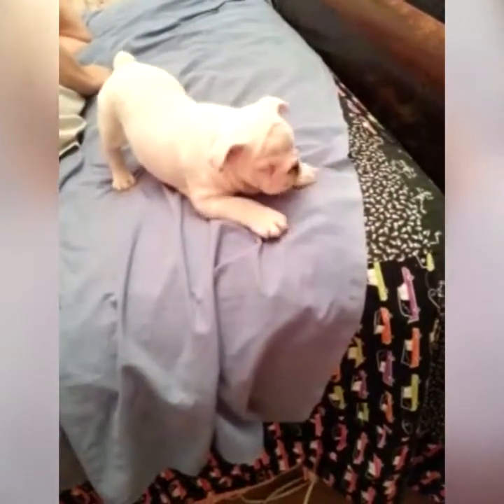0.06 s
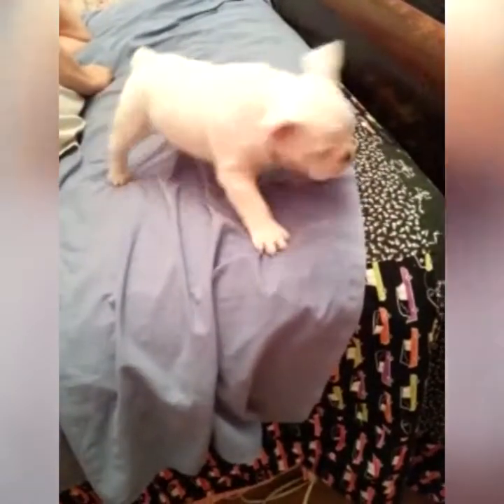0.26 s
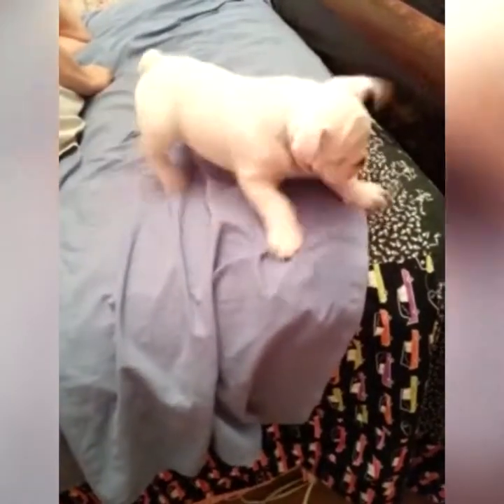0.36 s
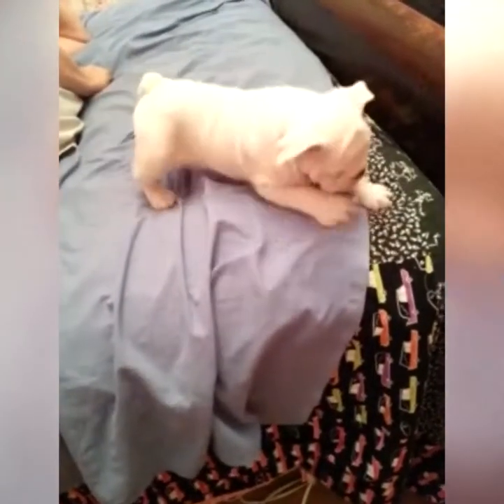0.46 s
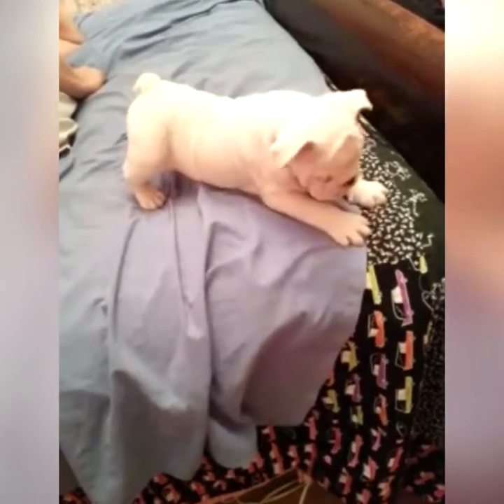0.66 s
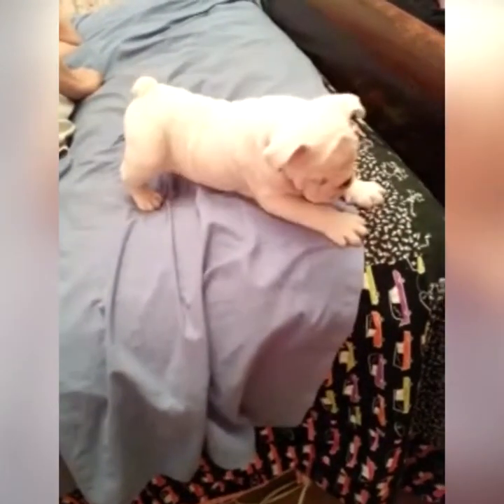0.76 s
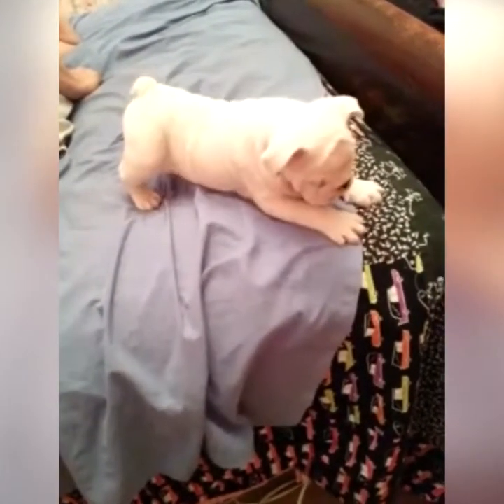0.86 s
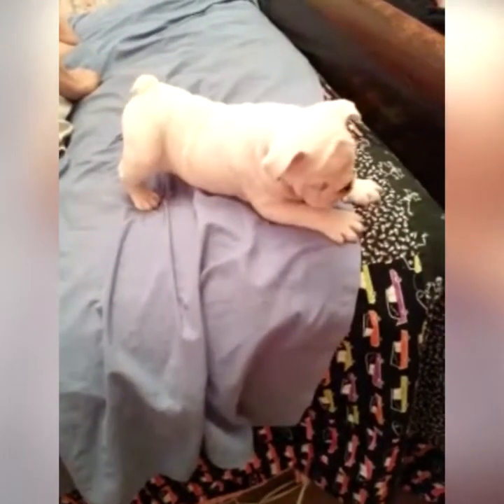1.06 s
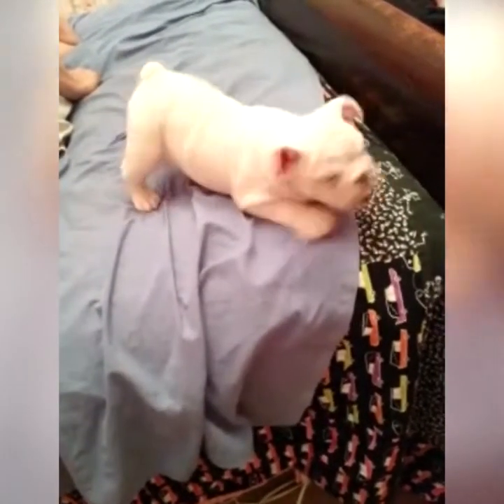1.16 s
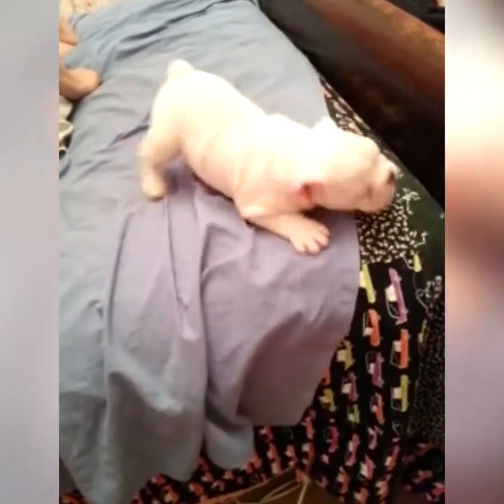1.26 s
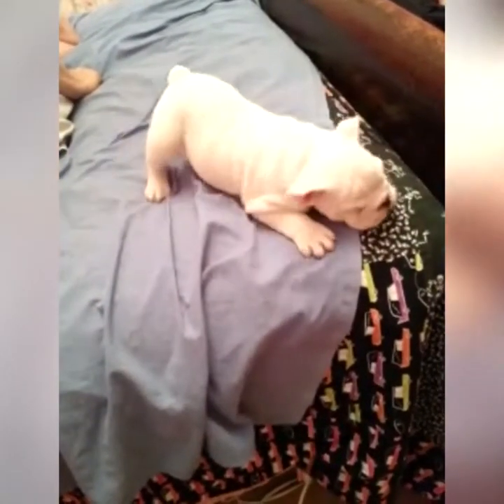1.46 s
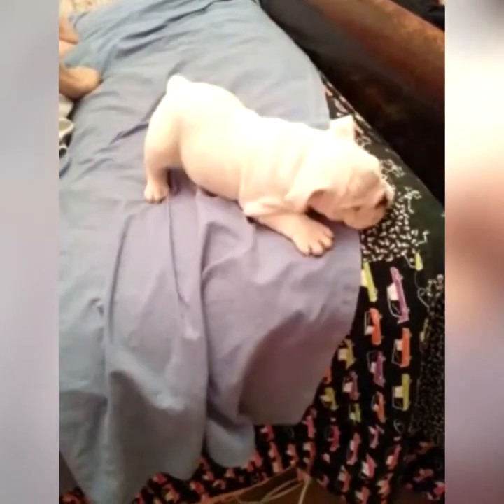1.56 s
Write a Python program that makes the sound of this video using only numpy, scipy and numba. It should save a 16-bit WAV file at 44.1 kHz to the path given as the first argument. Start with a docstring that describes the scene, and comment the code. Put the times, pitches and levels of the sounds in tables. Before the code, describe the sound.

A small puppy growls briefly, then gives two short, harsh barks close by.

```python
"""A small puppy on a bed, close by, in a soft small room with faint hum and hiss.
First a slow creaky growl: single vocal-fold flaps ring the throat and closed mouth. At 0.2 s it runs
into a bark that starts harsh, then locks into a clear tone while the mouth closes. Paws rustle the
bedding around it. At 1.2 s a few flaps lead into a second such bark, then more rustle and one tick.
Gain control ducks the loud moments, a bass thump sits under them and the highest peaks clip."""
import sys
import numpy as np
from scipy import signal
from scipy.fft import rfft, irfft, next_fast_len
from scipy.io import wavfile
from scipy.ndimage import uniform_filter1d, map_coordinates
from numba import njit

SR = 44100
rng = np.random.default_rng(int(sys.argv[2]) if len(sys.argv) > 2 else 0)


def wav_record(signal):
    """Record a signal, one row per channel, as 16-bit PCM in the file named by sys.argv[1]."""
    frames = np.transpose(np.atleast_2d(signal))
    bounded = np.clip(frames, -1, 1)
    # unit amplitude maps onto the largest positive 16-bit level
    quanta = np.round(bounded * 32767).astype(np.int16)
    wavfile.write(sys.argv[1], SR, quanta)


N = 72765

# Hum and hiss spectrum: freq_hz, relative_db
FLOOR_SPECTRUM = [(15, -55), (25, -19.5), (50, -15.5), (110, -6.5), (300, -14), (600, -21), (1200, -25.5),
                  (5000, -31.5), (9000, -32), (13000, -33), (15000, -38.5)]
# Left-right likeness of hum and hiss: freq_hz, correlation
FLOOR_CORRELATION = [(60, 0.18), (200, .3), (500, 0.035)]
# Room decay: freq_hz, t60_s
ROOM_DECAY = [(200, .3), (900, 0.2), (3000, 0.22), (12000, 0.056)]
# Bedding envelope, one list per rustle: time_s, relative_db
RUSTLES = [
    [(0.0, -68), (0.178, -64.5), (0.21, -50.5)],
    [(0.38, -54), (0.424, -58.5), (0.562, -60), (0.616, -66), (0.656, -65), (0.75, -75.5)],
    [(1.41, -51.5), (1.476, -59), (1.552, -66.5), (1.65, -74.5)],
]
# Cloth spectrum: freq_hz, relative_db
CLOTH_SPECTRUM = [(60, -31), (120, -10), (350, -3.5), (800, -11.5), (2000, -15), (3600, -16.5),
                  (6000, -23.5), (10000, -26), (15000, -28.5)]
# Claw or lip tick: start_s, level_db
TICK_EVENT = [(1.501, -28.5)]
# Single vocal-fold flaps: start_s, mouth_relative_db, throat_relative_db
FOLD_FLAPS = [(0.008, -34, -34.5), (0.023, -42, -43.5), (0.038, -35, -34), (0.051, -38.5, -31.5),
              (0.059, -40.5, -39), (0.081, -26, -45), (0.087, -35.5, -31.5), (0.096, -28, -44),
              (0.107, -27.5, -38.5), (0.12, -33.5, -30.5), (0.13, -30, -41), (0.143, -27, -34),
              (0.155, -18, -38.5), (0.163, -20, -32), (0.17, -28.5, -26.5), (0.186, -17.5, -20.5),
              (0.192, -15, -40), (0.204, -14, -21), (0.21, -16, -23), (1.219, -37.5, -53),
              (1.234, -20, -33), (1.243, -18, -39), (1.248, -18, -56), (1.253, -17.5, -37),
              (1.259, -22, -26)]
# Closed-mouth resonances: centre_hz, width_hz, gain_db
CLOSED_MOUTH_MODES = [(578.6, 120, 8.5), (1461, 480, 0)]
# Fold vibration through both barks: time_s, pitch_hz, disorder (0-1)
BARK_PITCH = [(.215, 325, .8), (.248, 345, .65), (.259, 330, .6), (.264, 425, .5), (.278, 432, .45),
              (.29, 467, .2), (.314, 466, .2), (.328, 435, .35), (.34, 415, .5), (.355, 320, .9),
              (.37, 420, 1), (1.26, 335, .8), (1.291, 333, .5), (1.297, 415, .2), (1.32, 418, .25),
              (1.34, 414, .4), (1.353, 372, .65), (1.385, 385, .9)]
# Harsh voice, one list per bark, levels relative:
# time_s, mouth_db, mouth_hz, upper_db, upper_hz, top_db, breath_db, chest_db
HARSH_BARKS = [
    [(0.215, -14.5, 994, -42, 2716, -44, -35, -32), (0.223, -8, 999, -27.5, 2780, -20, -35, -29),
     (0.233, -9, 993, -28.5, 2730, -13, -29, -17.5), (0.261, -10, 968, -18.5, 2690, -17, -27.5, -41),
     (0.305, -12, 908.5, -23, 2614, -25.5, -47.5, -59), (0.315, -19, 969, -23.5, 2546, -23, -46, -54),
     (0.349, -24.5, 886.4, -30, 2550, -30.5, -50, -33.5), (0.4, -37.5, 857, -39, 2690, -52.5, -56, -41.5)],
    [(1.263, -19, 1045, -20, 2860, -19.5, -38, -18.5), (1.27, -5.5, 1085, -31, 2723, -25, -41, -27.5),
     (1.276, -14.5, 1058, -24, 2790, -15, -39.5, -29), (1.292, -4, 971, -26, 2638, -18.5, -40.5, -36.5),
     (1.302, -15.5, 906.5, -18.5, 2536, -26, -37, -51), (1.312, -8.5, 860, -20.5, 2530, -21.5, -42, -36),
     (1.335, -16.5, 819, -19.5, 2133, -24.5, -49, -51), (1.358, -15, 776.3, -20, 2107, -27, -47.5, -33.5),
     (1.382, -22.5, 736, -29, 2220, -38, -45, -33), (1.42, -41.5, 794.6, -48.5, 2197, -59.5, -47.5, -68)],
]
# Breath spectrum: freq_hz, relative_db
BREATH_SPECTRUM = [(3800, -33.5), (4300, -14), (4750, -17.5), (5500, 3.5), (6400, -19.5), (7800, -10),
                   (10500, -7), (13000, -19), (15000, -32)]
# Clear voice, one list per bark: time_s, partial1_db, partial2_db, partial3_db
CLEAR_BARKS = [
    [(.222, -34, -46, -21), (.246, -36, -36.5, -10), (.26, -23.5, -18.5, -12), (.272, -16, -16.5, -31.5),
     (.296, -19.5, -6, -29), (.318, -21.5, -16.5, -31), (.335, -19, -17, -35), (.355, -29, -27, -42)],
    [(1.268, -34, -35, -17), (1.288, -23.5, -30, -16), (1.298, -20.5, -20.5, -25.5),
     (1.312, -11, -12.5, -28.5), (1.326, -30, -16.5, -22.5), (1.34, -18, -16, -27.5),
     (1.355, -35, -16.5, -45.5), (1.38, -39.5, -32.5, -30)],
]
# Phase between the two microphone ports: freq_hz, left_lead_rad
PORT_PHASE = [(0, 0), (520, 0), (860, -1.4), (1210, -1.1), (1810, -3.5), (2070, -6), (3270, -6.3),
              (3880, -7.9), (4910, -10.3), (15000, -20)]
# Balance between the ports: freq_hz, left_over_right_db
PORT_BALANCE = [(300, .3), (800, 3), (2500, .5), (5000, 3), (12000, 2.5)]

FLOOR_DB, ROOM_DB = -56, -6
RUSTLE_GAIN_DB, CLOTH_MONO_BELOW_HZ = 12.5, 350
TICK_HZ, TICK_T60_S = 1007, 0.021
FLAP_MOUTH_GAIN_DB, FLAP_TAU_S, LIPS_CUTOFF_HZ = 30, 0.0000775, 1750
LEAK_DB, LEAK_T60_S = -23, 0.035
THROAT_HZ, THROAT_WIDTH_HZ, THROAT_GAIN_DB = 270, 200, 36.5
NOSE_HZ, NOSE_WIDTH_HZ, NOSE_GAIN_DB = 3400, 660, -54.5
PULSE_JITTER, AIR_SHARE, CLEAR_WAVER = 0.27, 0.62, 0.04  # fractions at full disorder
JITTER_RATE_HZ, SCATTER_DB, SHIMMER_DB = 300, 2, 3
MOUTH_WIDTH_HZ, MOUTH_GAIN_DB = 320, 1.5
CHEST_HZ, CHEST_WIDTH_HZ, CHEST_GAIN_DB = 340, 220, -0.5
PALATE_HZ, PALATE_WIDTH_HZ, PALATE_GAIN_DB = 1550, 460, -13.5
UPPER_WIDTH_HZ, TOP_HZ, TOP_WIDTH_HZ = 650, 3300, 900
NOTCH_HZ, NOTCH_WIDTH_HZ, NOTCH_DEPTH = 1700, 160, 0.7
DUCK_THRESHOLD_DB, DUCK_SHARE, DUCK_TAU_S = -17.5, 0.77, 0.18
THUMP_HZ, THUMP_GAIN_DB = 45, -28.5
CLIP_LEVEL, CLIP_HARDNESS, BAND_LIMIT_HZ = 1.02, 18, 14800


def amp(db):
    """dB to gain."""
    return 10 ** (np.asarray(db) / 20)


def unit_rms(x):
    """Scale to rms 1."""
    return x / np.sqrt(np.mean(x ** 2) + 1e-20)


def log_interp(points, hz):
    """Interpolate (freq_hz, value) points on a log axis."""
    freqs_hz, values = np.transpose(points)
    return np.interp(np.log(hz + 1), np.log(freqs_hz + 1), values)


def curves(tables):
    """A gate with 4 ms edges, then each value column of the joined tables per sample."""
    t = np.arange(N) / SR
    gate = sum((t >= rows[0][0]) & (t <= rows[-1][0]) for rows in tables)
    times_s, *columns = np.transpose(np.vstack(tables))
    return [uniform_filter1d(gate * 1., size=176)] + [np.interp(t, times_s, c) for c in columns]


def wobble(rate_hz):
    """Smooth random curve, rate_hz knots a second."""
    knots = rng.standard_normal(int(N * rate_hz / SR) + 4)
    return map_coordinates(knots, [np.arange(N) * rate_hz / SR])


def filtered(x, response):
    """Apply a complex frequency response."""
    size = next_fast_len(N + SR // 2)
    return irfft(rfft(x, size) * response(np.fft.rfftfreq(size, 1 / SR)), size)[..., :N]


def noise(spectrum, channels):
    """Coloured noise, rms 1."""
    white = rng.standard_normal((channels, N))
    return unit_rms(filtered(white, lambda f: amp(log_interp(spectrum, f))))


def bandpass(f, hz, width_hz):
    """Response of one causal resonance at frequencies f."""
    return 1j * f * width_hz / (hz * hz - f * f + 1j * f * width_hz)


@njit
def resonate(x, step_rad, radius):
    """Two-pole resonator with a moving centre."""
    y = np.zeros(len(x))
    for i in range(2, len(x)):
        y[i] = x[i] - x[i - 2] + 2 * radius * np.cos(step_rad[i]) * y[i - 1] - radius ** 2 * y[i - 2]
    return y


def formant(x, hz, width_hz):
    """Two resonators in series, each width_hz wide; output rms 1."""
    step_rad = 2 * np.pi * hz * np.ones(N) / SR
    radius = np.exp(-np.pi * width_hz / SR)
    return unit_rms(resonate(resonate(x, step_rad, radius), step_rad, radius))


def hum_and_hiss():
    """Steady room noise, its low hum partly shared by both ports."""
    def mid_side_gains(f):
        angle_rad = np.arccos(log_interp(FLOOR_CORRELATION, f)) / 2
        return np.array([np.cos(angle_rad), np.sin(angle_rad)])

    mid, side = filtered(noise(FLOOR_SPECTRUM, channels=2), mid_side_gains)
    return amp(FLOOR_DB) * np.array([mid + side, mid - side])


def room_reverb(x):
    """Each frequency dies at its own rate; the lows reach both ports alike."""
    hz, t, bins = signal.stft(rng.standard_normal((2, SR // 2)), SR, nperseg=256)
    unshared = np.clip(hz / 900, 0, 1)[:, None] ** 2
    bins[1] = unshared * bins[1] + np.sqrt(1 - unshared ** 2) * bins[0]
    decay = amp(-60 * t / log_interp(ROOM_DECAY, hz)[:, None])
    tail = signal.istft(bins * decay, SR, nperseg=256)[1]
    delayed = np.pad(x, (200, 0))[None]
    return signal.fftconvolve(delayed, tail / np.linalg.norm(tail[0]), axes=1)[:, :N]


def bedding():
    """Cloth rustles unevenly under the paws."""
    gate, level_db = curves(RUSTLES)
    mid, side = noise(CLOTH_SPECTRUM, channels=2)
    side = filtered(side, lambda f: 1 / (1 + (CLOTH_MONO_BELOW_HZ / (f + 1)) ** 2))
    envelope = gate * amp(level_db + RUSTLE_GAIN_DB + 1.5 * wobble(rate_hz=49))
    return envelope * np.array([mid + side, mid - side]) / np.sqrt(2)


def tick():
    """A claw or lip clicks once: a damped sine."""
    start_s, level_db = TICK_EVENT[0]
    t = (np.arange(N) / SR - start_s).clip(0)
    attack = 1 - np.exp(-t / 0.00074)
    return amp(level_db - 60 * t / TICK_T60_S) * attack * np.sin(2 * np.pi * TICK_HZ * t)


def growl():
    """Soft fold flaps, each with a leak of air, ring closed mouth and throat; the nose adds breath."""
    def ring(f, hz, width_hz):
        return bandpass(f, hz, width_hz) * bandpass(f, hz, 3 * width_hz)

    def closed_mouth(f):
        soft_flap = 1 / (1 + 2j * np.pi * f * FLAP_TAU_S) ** 2
        shut_lips = 1 / (1 + 1j * np.sqrt(2) * f / LIPS_CUTOFF_HZ - (f / LIPS_CUTOFF_HZ) ** 2) ** 2
        modes = sum((-1) ** k * amp(gain_db) * ring(f, hz, width_hz)
                    for k, (hz, width_hz, gain_db) in enumerate(CLOSED_MOUTH_MODES))
        return soft_flap * shut_lips * modes

    flaps = np.zeros((2, N))  # rows: mouth, throat
    for start_s, mouth_db, throat_db in FOLD_FLAPS:
        flaps[:, round(start_s * SR)] = amp([mouth_db + FLAP_MOUTH_GAIN_DB, throat_db + THROAT_GAIN_DB])
    t = np.arange(SR // 10) / SR
    leak_shape = amp(-60 * t / LEAK_T60_S) * (1 - np.exp(-t / 0.0014))
    leak = signal.fftconvolve(flaps, leak_shape[None], axes=1)[:, :N]
    drive = flaps + amp(LEAK_DB) * leak * rng.standard_normal((2, N))
    mouth = filtered(drive[0], closed_mouth)
    throat = filtered(drive[1], lambda f: ring(f, THROAT_HZ, THROAT_WIDTH_HZ))
    nose = amp(NOSE_GAIN_DB) * leak[0] * formant(rng.standard_normal(N), NOSE_HZ, NOSE_WIDTH_HZ)
    return mouth + throat + nose


def harsh_voice():
    """Irregular fold pulses and fold-gated air drive moving and fixed resonances; breath hisses."""
    gate, mouth_db, mouth_hz, upper_db, upper_hz, top_db, breath_db, chest_db = curves(HARSH_BARKS)
    _, pitch_hz, disorder = curves([BARK_PITCH])
    jitter = (1 + PULSE_JITTER * disorder ** 2 * wobble(JITTER_RATE_HZ)).clip(0.2)
    cycles = np.cumsum(pitch_hz * jitter) / SR
    pulses = np.diff(np.floor(cycles), prepend=0) * amp(SCATTER_DB * wobble(rate_hz=200))
    fold_opening = 1 + np.cos(2 * np.pi * cycles)
    air = rng.standard_normal(N) * fold_opening * amp(SCATTER_DB * wobble(rate_hz=130))
    air_share = AIR_SHARE * disorder ** 2
    source = (1 - air_share) * unit_rms(pulses) + air_share * unit_rms(air)
    chest = amp(chest_db + CHEST_GAIN_DB) * formant(air, CHEST_HZ, CHEST_WIDTH_HZ)
    mouth = disorder * amp(mouth_db + MOUTH_GAIN_DB) * formant(source, mouth_hz, MOUTH_WIDTH_HZ)
    palate = amp(mouth_db + PALATE_GAIN_DB) * formant(source, PALATE_HZ, PALATE_WIDTH_HZ)
    upper = amp(upper_db) * formant(source, upper_hz, UPPER_WIDTH_HZ)
    top = amp(top_db) * formant(source, TOP_HZ, TOP_WIDTH_HZ)
    breath = amp(breath_db) * noise(BREATH_SPECTRUM, channels=1)[0]
    return gate * (chest + mouth + palate + upper + top + breath)


def clear_voice():
    """The locked voice: three partials on one slightly wavering pitch."""
    gate, *partials_db = curves(CLEAR_BARKS)
    _, pitch_hz, disorder = curves([BARK_PITCH])
    waver = 1 + CLEAR_WAVER * disorder * wobble(rate_hz=90)
    phase_rad = 2 * np.pi * np.cumsum(pitch_hz * waver) / SR
    tone = sum(amp(level_db + SHIMMER_DB * wobble(rate_hz=80)) * np.sin(k * phase_rad)
               for k, level_db in enumerate(partials_db, start=1))
    return np.sqrt(2) * gate * tone


def barks():
    """Harsh plus clear voice; a side pocket of the mouth swallows one band."""
    voice = harsh_voice() + clear_voice()
    return filtered(voice, lambda f: 1 - NOTCH_DEPTH * bandpass(f + 1, NOTCH_HZ, NOTCH_WIDTH_HZ))


def scene():
    """The puppy reaches two ports with a lag, over reverb, bedding, hum and hiss."""
    def ports(f):
        split = np.array([[0.5], [-0.5]])  # left, right
        return amp(split * log_interp(PORT_BALANCE, f)) * np.exp(1j * split * log_interp(PORT_PHASE, f))

    puppy = growl() + barks() + tick()
    direct = filtered(puppy[None], ports)
    return direct + amp(ROOM_DB) * room_reverb(puppy) + bedding() + hum_and_hiss()


def record(dry):
    """Gain control ducks loud moments, the capsule thumps under them, peaks clip, the top is cut."""
    power = uniform_filter1d(np.mean(dry ** 2, axis=0), size=441)  # 10 ms
    level_db = 10 * np.log10(np.abs(power) + 1e-12)
    excess_db = (level_db - DUCK_THRESHOLD_DB).clip(0)
    pole = np.exp(-1 / (DUCK_TAU_S * SR))
    duck_db = signal.lfilter([1 - pole], [1, -pole], DUCK_SHARE * excess_db)
    ducked = dry * amp(-duck_db)
    thump = filtered(np.mean(ducked ** 2, axis=0), lambda f: bandpass(f, THUMP_HZ, width_hz=70) ** 2)
    mix = ducked + amp(THUMP_GAIN_DB) * thump
    clipped = mix / (1 + np.abs(mix / CLIP_LEVEL) ** CLIP_HARDNESS) ** (1 / CLIP_HARDNESS)
    return filtered(clipped, lambda f: f < BAND_LIMIT_HZ)


dry = scene()
out = record(dry)
wav_record(out)
```